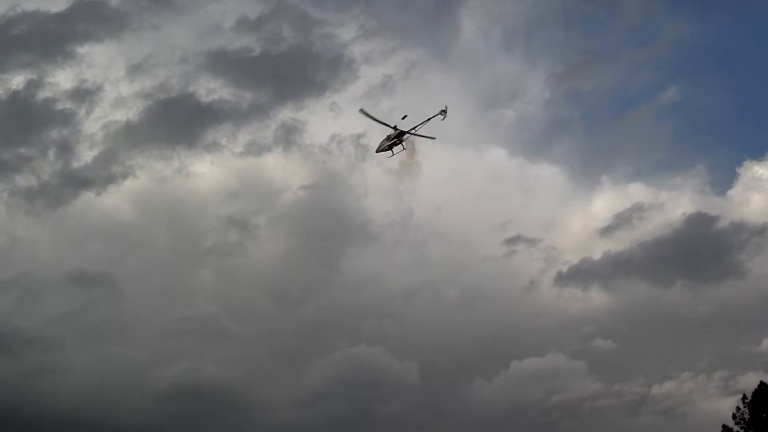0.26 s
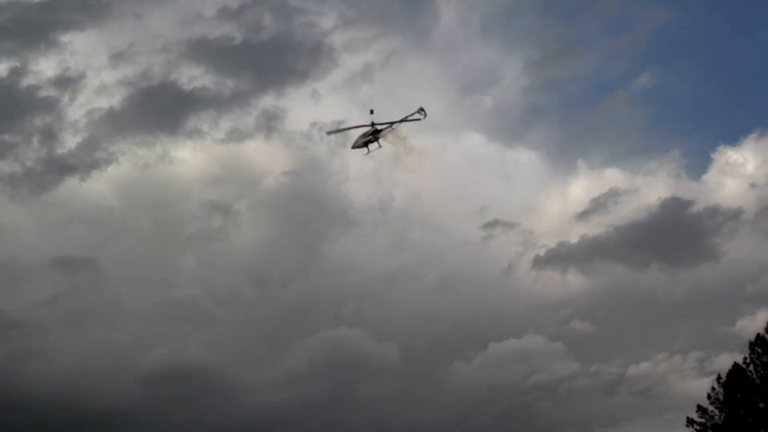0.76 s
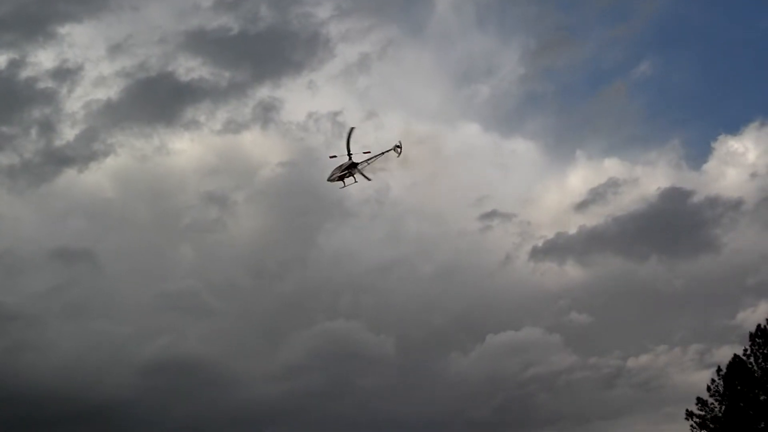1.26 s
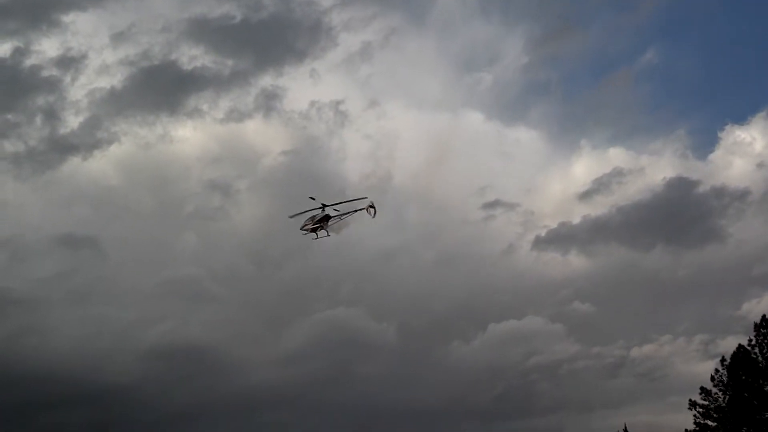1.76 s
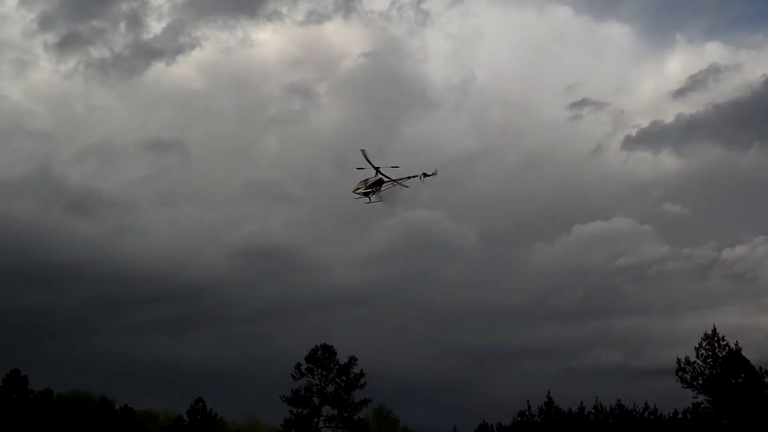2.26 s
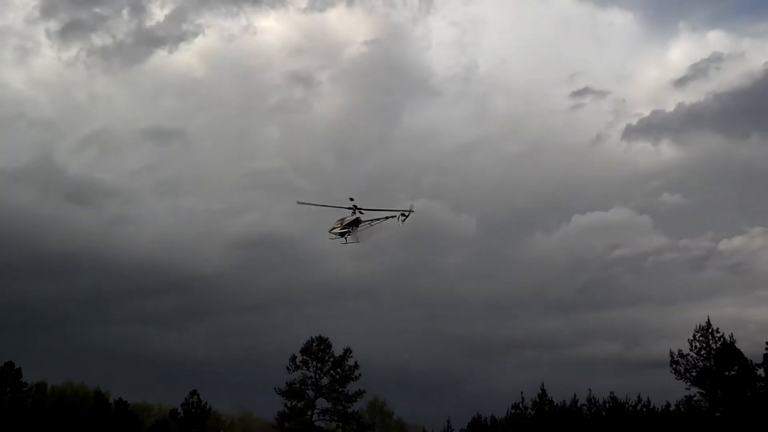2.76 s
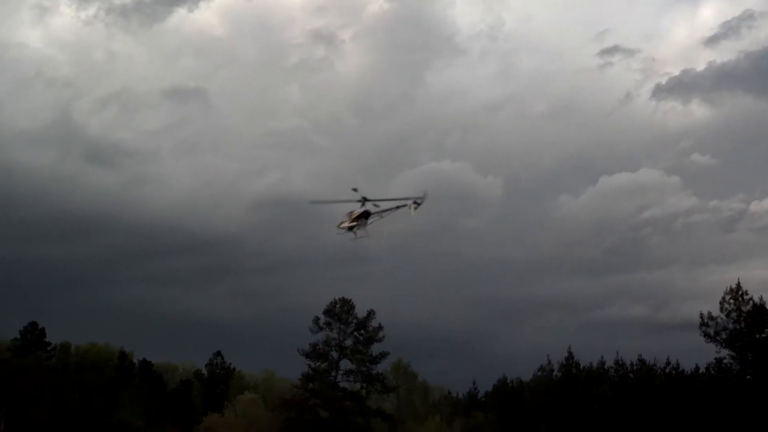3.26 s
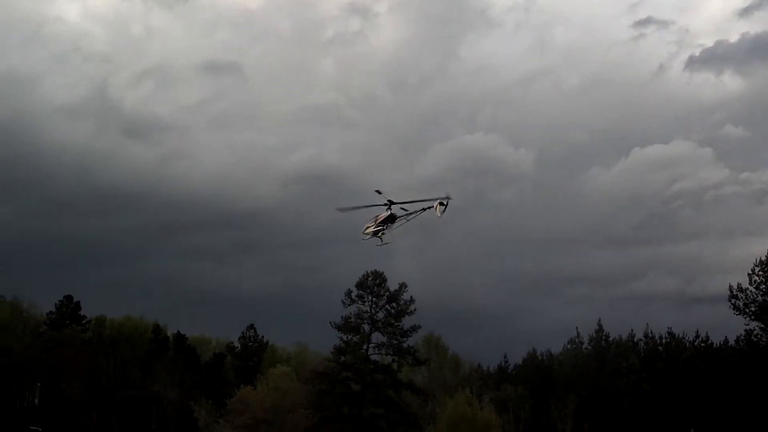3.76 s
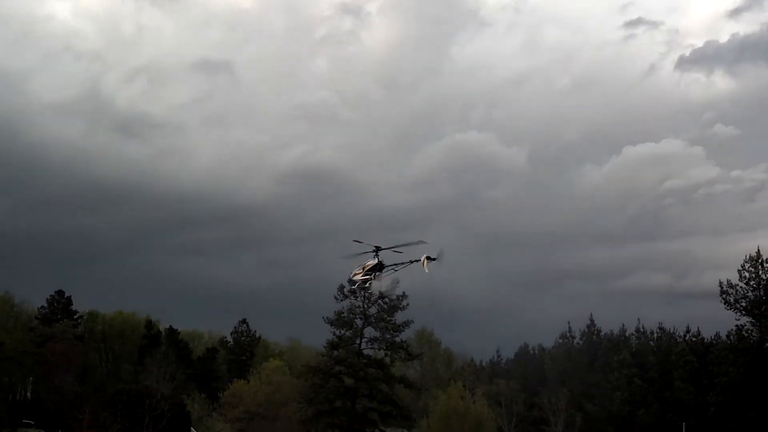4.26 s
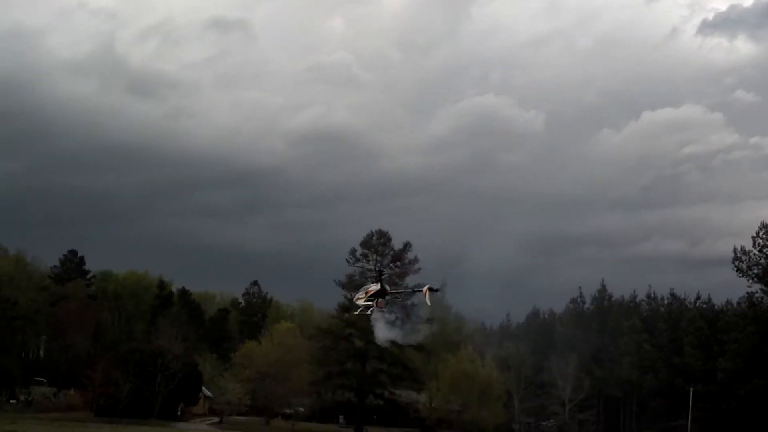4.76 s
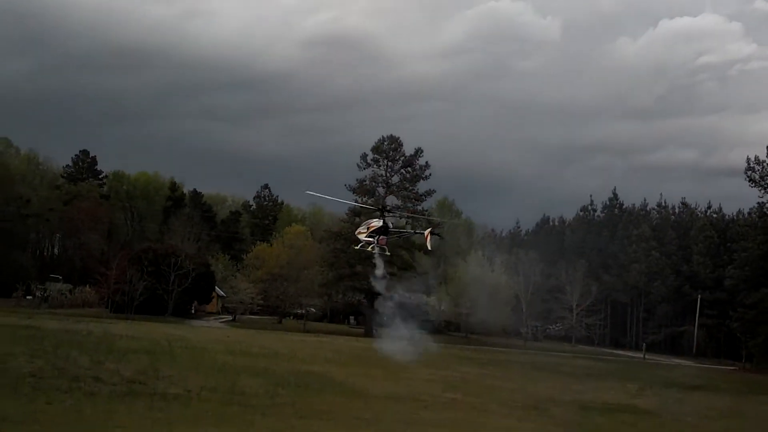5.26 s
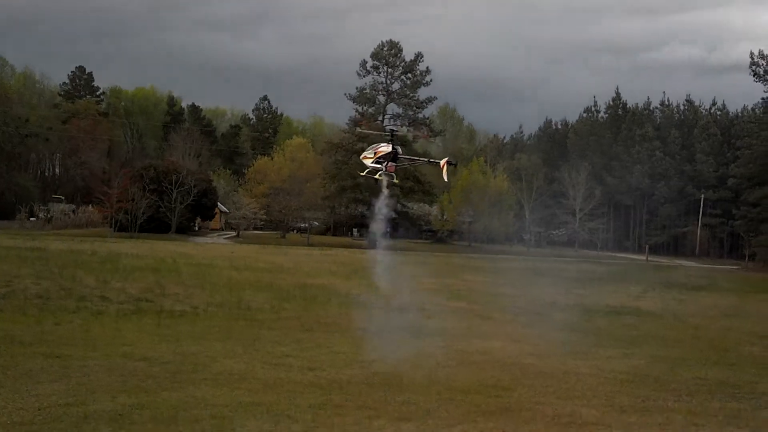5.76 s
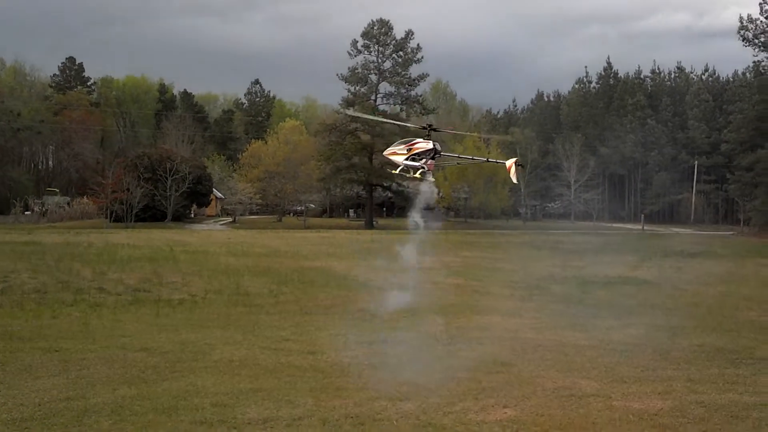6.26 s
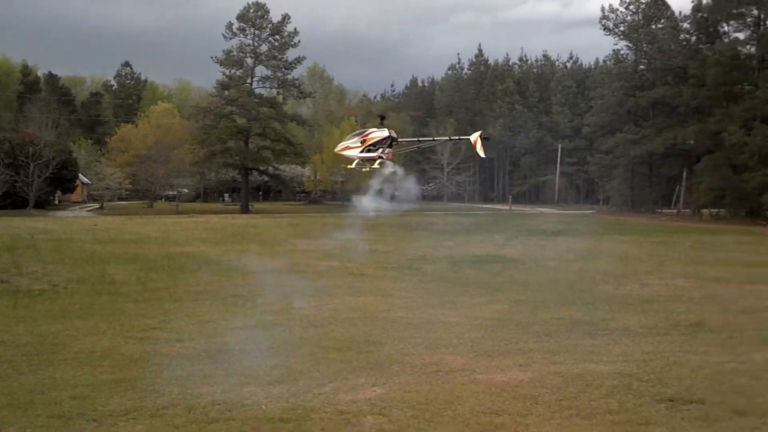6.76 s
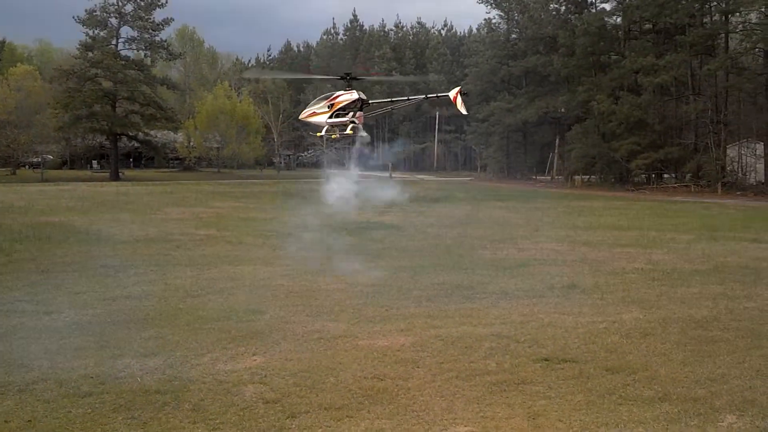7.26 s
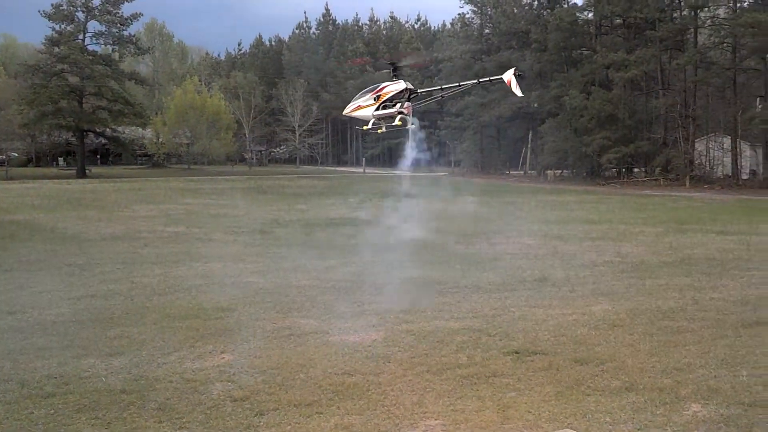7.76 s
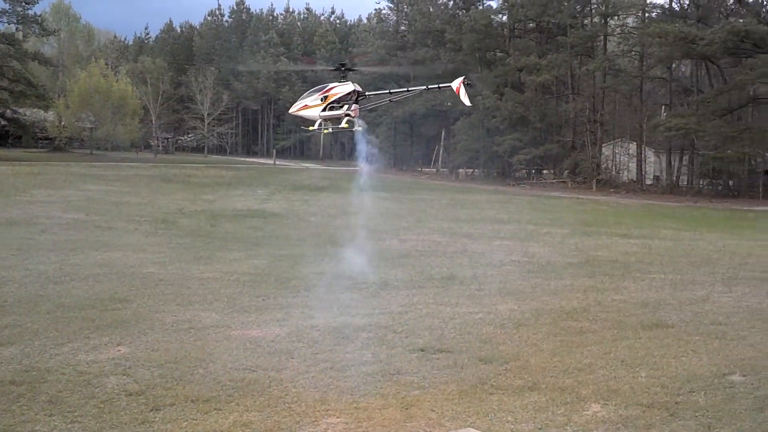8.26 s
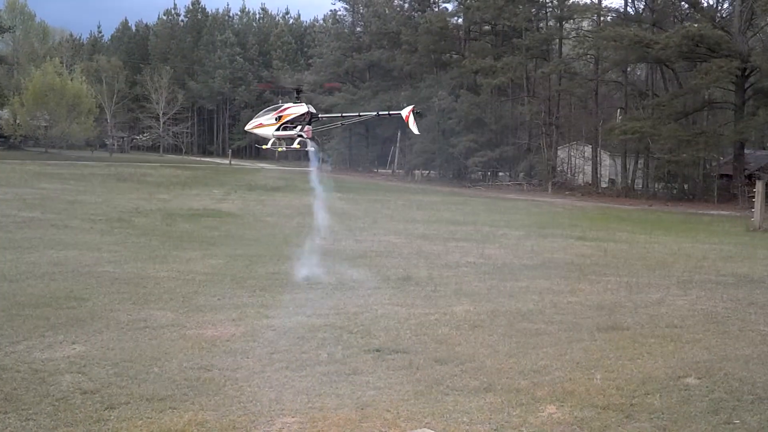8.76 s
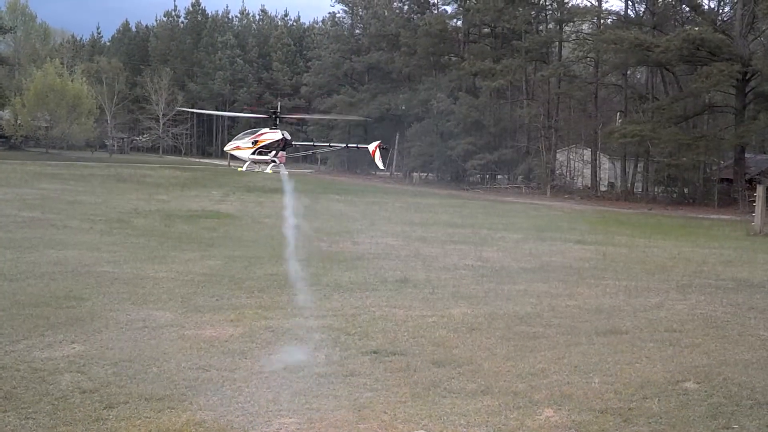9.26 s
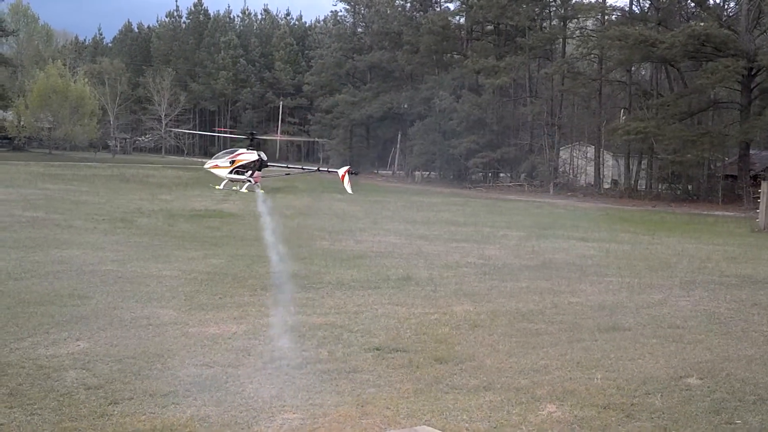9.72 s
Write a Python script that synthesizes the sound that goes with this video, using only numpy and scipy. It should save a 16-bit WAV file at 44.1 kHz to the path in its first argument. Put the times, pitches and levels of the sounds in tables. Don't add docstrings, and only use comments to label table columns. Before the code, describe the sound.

A small engine-powered model helicopter drones with a steady raspy buzz, hissing puffs and blade swish, sinking over a grassy field and hovering close by.

```python
import sys
import numpy as np
from scipy import signal
from scipy.fft import rfft, irfft, next_fast_len
from scipy.io import wavfile
from scipy.ndimage import uniform_filter1d

SR = 44100
rng = np.random.default_rng(int(sys.argv[2]) if len(sys.argv) > 2 else 0)


def wav_out(sig):
    wavfile.write(sys.argv[1], SR, np.round(np.clip(np.atleast_2d(sig).T, -1, 1) * 32767).astype(np.int16))


def invert_db(level):
    return 10 ** (np.asarray(level, dtype=float) / 20)


N = 440550
T = np.arange(N) / SR
SLOW_T = T[::256]

# start_s, engine_effort_db, muffler_toward_us_db
FLIGHT = [(0, 2.5, 1.5), (.8, 1, -4), (1.15, 2, -4.5), (1.55, 2, -2), (2.1, 0, -5.5), (2.7, 2, -3.5),
          (3.4, 2.5, -2.5), (4.1, 2.5, -4), (4.65, 0.5, -8), (5.2, 1.5, -5), (5.8, 1.5, -5), (6.4, 2.5, 1),
          (7.1, 0.5, 3.5), (7.9, 0.5, 6.5), (8.6, 1, 6), (9.2, -1.5, 0), (9.6, 0, -2), (9.99, 2.5, 8)]
# start_s, firing_rate_hz
ENGINE_SPEED = [(0, 103.3), (.65, 103.7), (1.2, 103.6), (2.06, 104.3), (2.4, 103.9), (2.85, 104.1),
                (3.35, 103.1), (3.9, 103.3), (4.4, 103.5), (4.9, 104.1), (6.2, 104.1), (7.8, 103.8),
                (8.05, 103.2), (8.5, 103.8), (9.1, 103.1), (9.4, 103.5), (9.99, 103.3)]
# firing_multiple, level_db
EXHAUST_TONES = [(3, -51.5), (5, -63.5), (7, -56), (8, -52.5), (9, -58), (10, -50.5), (12, -49.5),
                 (13, -50), (17, -65), (19, -50), (20, -45), (21, -53), (22, -46), (23, -68), (24, -59),
                 (25, -79), (26, -70), (29, -76), (30, -53), (34, -54), (35, -49.5), (36, -52.5), (37, -70),
                 (38, -57.5)]
# firing_multiple, level_db, echo_share (0-1), echo_shift_ms, before_swing_db
DRONE_LINES = [(1, -52, 0.68, -0.018, 0), (2, -37.5, 0.82, -0.33, -3), (4, -50, 0.45, .4, -4),
               (6, -46, 0.23, 0.092, -3), (11, -46.5, 0.37, 0.026, -4.5), (14, -46, 0.42, 0.047, -5),
               (15, -42.5, 0.64, 0.024, -5), (16, -41.5, 0.44, 0.015, -16), (18, -45, 0.4, 0.043, 5.5)]
# rotor_multiple, level_db
ROTOR_LINES = [(6, -61), (7, -56.5), (8, -54.5), (13, -59), (15, -61.5), (20, -63)]
# start_s, pitch_hz, level_db
WHISTLE_GLIDE = [(0, 1975, -44), (1, 1997, -55), (1.6, 2002, -41), (2.05, 2018, -39), (2.5, 1997, -42.5),
                 (3, 1960, -59), (3.5, 1910, -60), (4.75, 1950, -63), (5.3, 1910, -64), (5.9, 1950, -52),
                 (6.3, 1915, -37.5), (7, 1918, -43), (8.8, 1915, -52.5), (9.99, 1918, -33)]
# pitch_hz, level_db
ROAR_COLOUR = [(60, -19.5), (100, -10), (200, -6.5), (500, -7), (900, -9.5), (1500, -5), (2000, -5.5),
               (2500, -14.5), (3200, -10), (4500, -22)]
# pitch_hz, level_db
PUFF_COLOUR = [(1500, -24), (3000, -18), (3800, 1.5), (4800, -15), (5600, -1.5), (6700, 6.5), (8300, -10.5),
               (12000, -7.5), (15000, 0.5), (17000, -7.5)]
# pitch_hz, level_db
SWISH_COLOUR = [(2000, -20), (4500, -8.5), (7000, -5), (8500, -11), (10500, -4), (12000, -4),
                (13000, -14.5), (15000, -6.5), (17000, -10.5)]
# pitch_hz, level_db
RING_COLOUR = [(1500, -24), (1800, 0), (1950, 4.5), (2150, 2), (2350, -26)]
GUST_COLOUR = [(30, -30), (100, -1), (200, -3), (350, -16), (600, -28)]
# start_s, delay_ms
GRASS_PATH = [(0, 5.93), (.7, 5.88), (1.1, 5.72), (1.6, 5.29), (2.1, 4.77), (2.8, 4.16), (3.3, 3.97),
              (3.8, 3.7), (4.3, 3.45), (4.8, 2.89), (5.3, 2.61), (6, 2.48), (6.8, 2.55), (8.1, 2.67),
              (8.6, 2.53), (9.1, 2.31), (9.6, 1.95), (10, 1.74)]
# start_s, lag_samples
BEARING_LAG = [(0, 11.1), (1.3, 11.14), (1.9, 10.92), (2.05, 10.12), (4.2, 10.2), (6.7, 10.46),
               (6.8, 11.55), (7.9, 11.34), (8.1, 11.9), (9.99, 11.9)]
# pitch_hz, phase_lead_rad, bearing_sensitivity (ratio), first_minus_second_port_db, diffuse_share_db
PORT_COLOUR = [(100, -0.58, -10, 0, -30), (230, 0, 2, 1.5, -13.5), (600, 0.05, 0.5, 0.5, -14),
               (1257, 0.01, 1.6, 1.5, -20), (2190, 2.5, -0.05, -9, -9.5), (2140, 2, 7, -7.5, -12),
               (3526, 3, -0.1, 6, -11), (4470, 6, 1.5, 13.5, -16.5), (6330, 9, 1.32, -5, -9.5),
               (6940, 10, 1.44, 4, -12), (9300, 13.5, 2, 8, 0.5), (9900, 14.5, 2, 8, -16),
               (12630, 19, 0.57, -8.5, -2.5), (14450, 22.5, 1.1, -14.5, -5), (15900, 24, 1.6, -3, 1)]
# start_s (bump centre), level_db, length_s
GUST_BUMPS = [(4.045, -49, .03), (5.1, -52, 0.028), (5.28, -55, 0.019), (6.153, -53, 0.033),
              (6.592, -43, 0.017), (6.616, -37, 0.01), (6.651, -44, .02), (6.697, -38, 0.011),
              (6.725, -44, .012), (7.13, -50, 0.018), (7.781, -42, .03), (8.1, -43, 0.021),
              (8.841, -46, .02), (9.7, -51, 0.028), (9.95, -46, .03)]
# start_s, depth_db
GAIN_DUCKS = [(.08, -1), (.57, -1), (1.08, -2.5), (1.75, -1), (2.33, -0.5), (2.87, -3), (3.13, -2.5),
              (3.421, -2), (4.28, -2.5), (4.97, -2), (5.52, -1.5), (6.07, -2.5), (6.27, -2), (6.73, -2.5),
              (7.47, -2.5), (7.83, -2), (8.28, -2), (8.73, -1.5), (8.971, -1.5)]

ROTOR_RATIO = 4.5
EXHAUST_DB, HISS_DB, RING_DB = -28.5, -34.5, -34.5
HISS_PER_EFFORT, HISS_PER_TURN = 0.24, 0.16
FLUTTER_DB = 0.52
LOWER_DB, UPPER_DB, UPPER_PER_TURN = -46.5, -42, 4
BLADE_DRONE, BLADE_DRONE_DB = 11, -43
SWING_S, SWING_LENGTH_S = 1.4, 0.61
SMEAR, SMEAR_CENTRE = .014, 13
SPLIT = .19
GRASS_DB, GRASS_HZ, LINE_ECHO = -11.5, 1450, 0.52
USUAL_LAG, CROSS = 11, 16
DUCK_FALL_S, RECOVER_DB_PER_S = .02, 11
EDGE_HZ = 15800


def helicopter():
    (rate,) = curves(ENGINE_SPEED)
    effort_db, turn_db = curves(FLIGHT)
    flutter_db = FLUTTER_DB * full(drift(14., count=1)[0])
    ring_db = RING_DB + turn_db + flutter_db
    hiss_db = HISS_DB + HISS_PER_EFFORT * effort_db + HISS_PER_TURN * turn_db + flutter_db
    turns, rotor = shafts(rate)
    load = invert_db(1.23 * (EXHAUST_DB + effort_db + flutter_db + 29.5))
    hiss = puffs(turns, rotor) + swish(turns, rotor)
    broad = roar(turns, rotor, load) + ring(ring_db) + invert_db(hiss_db) * unevenness() * hiss
    steady = exhaust(turns, load, ring_db) + lines(ROTOR_LINES, rotor, wander_db=5.5)
    steady = steady + whistle(rotor * ROTOR_RATIO, rate, turn_db) + drone(turns, rotor, effort_db)
    return broad, steady


def shafts(rate):
    jitter = twice_smoothed(1500)
    shake = evened(uniform_filter1d(rng.standard_normal(N), 400))
    turns = np.cumsum(rate * (1 + 0.00297 * jitter + 0.002008 * shake)) / SR
    rotor = np.cumsum(uniform_filter1d(rate, SR // 2)) / SR / ROTOR_RATIO
    return turns, rotor


def drone(turns, rotor, effort_db):
    rotor_hz = rotor[-1] / T[-1]
    before_swing = np.clip((SWING_S - SLOW_T) / SWING_LENGTH_S, 0, 1)
    swells = 1.36 * drift(9., count=len(DRONE_LINES)) + 0.65 * effort_db[::256]
    out = np.zeros(N)
    for (k, db, share, shift_ms, early_db), swell_db in zip(DRONE_LINES, swells):
        level = invert_db(db + early_db * before_swing + swell_db)
        out += partial(level * echo(k * rotor_hz * ROTOR_RATIO, share, shift_ms), k, turns)
    out += partial(invert_db(BLADE_DRONE_DB) * echo(BLADE_DRONE * rotor_hz), BLADE_DRONE, rotor)
    return np.sqrt(2) * out


def exhaust(turns, load, ring_db):
    tones = lines(EXHAUST_TONES[:9], turns, wander_db=1.5) * load
    upper = lines(EXHAUST_TONES[9:], turns, wander_db=2.0) * invert_db(0.47 * (ring_db + 31.5))
    return tones + upper


def whistle(turns, rate, turn_db):
    hz, db = curves(WHISTLE_GLIDE, SLOW_T)
    own_turns, rate = np.cumsum(full(hz)) / SR, rate[::256]
    upper_db = UPPER_DB + UPPER_PER_TURN * np.minimum(turn_db[::256], 0)
    out = np.zeros(N)
    for level_db, k in ((db, 0), (LOWER_DB, -1), (upper_db, 1)):
        level = full(invert_db(level_db) * abs(echo(hz + k * rate)))
        out += level * np.cos(2 * np.pi * (own_turns + k * turns))
    return np.sqrt(2) * out


def roar(turns, rotor, load):
    pulse = 0.81 + 0.23 * beat(2 * rotor, 0.48, 0) + 0.14 * beat(turns, 6.6, 0)
    return invert_db(-39.0) * load * noise(ROAR_COLOUR) * pulse


def ring(ring_db):
    return invert_db(uniform_filter1d(ring_db, SR // 4) - 8) * noise(RING_COLOUR)


def puffs(turns, rotor):
    pulse = 0.49 + 0.57 * beat(turns, 2.9, 0.13) + 0.076 * beat(2 * rotor, 0.17, 0)
    return invert_db(-5.5) * noise(PUFF_COLOUR) * pulse


def swish(turns, rotor):
    pulse = .5 + 0.36 * beat(2 * turns, 0.95, 0.42) + 0.28 * beat(2 * rotor, 0.91, 0.055)
    return invert_db(-4.5) * noise(SWISH_COLOUR) * pulse


def grass(x):
    dull = signal.filtfilt(*signal.butter(1, GRASS_HZ, fs=SR), x)
    return x + invert_db(GRASS_DB) * np.interp(T - curves(GRASS_PATH)[0] / 1000, T, dull)


def ports(x):
    hz, t, z = signal.stft(x, SR, nperseg=512, noverlap=384)
    lead, sense, tilt_db, diffuse_db = (c[:, None] for c in read(PORT_COLOUR, hz))
    extra_lag = curves(BEARING_LAG, t)[0] - USUAL_LAG
    lead = lead + 2 * np.pi * hz[:, None] / SR * sense * extra_lag
    half = np.exp(.5j * lead) * invert_db(tilt_db / 2)
    paths = rng.standard_normal((4, len(t), len(hz)))
    paths = uniform_filter1d(uniform_filter1d(paths, size=4, axis=1), size=2, axis=2)
    paths = evened(paths).transpose(0, 2, 1)
    scatter = invert_db(diffuse_db - 6) * (paths[:2] + 1j * paths[2:])
    heard = z * (np.array([half, 1 / half]) + scatter)
    return signal.istft(heard, SR, nperseg=512, noverlap=384)[1][:, :N]


def gusts():
    shape = np.zeros(len(SLOW_T))
    for s, db, length in GUST_BUMPS:
        shape += invert_db(db) * np.exp(-.5 * ((SLOW_T - s) / length) ** 2)
    return np.array([[.5], [-.5]]) * (full(shape) + invert_db(-80)) * noise(GUST_COLOUR)


def lines(table, turns, wander_db):
    swells = drift(9., count=len(table))
    out, speed = np.zeros(N), (turns[-1] - turns[0]) / T[-1]
    for (k, db), swell in zip(table, swells):
        out += partial(invert_db(db + wander_db * swell) * echo(k * speed), k, turns)
    return np.sqrt(2) * out


def partial(gain, k, turns):
    lagged = k * turns - SMEAR * (k - SMEAR_CENTRE) ** 2 - SPLIT * (k % 2)
    return full(abs(gain)) * np.cos(2 * np.pi * lagged + full(np.angle(gain)))


def echo(hz, share=LINE_ECHO, shift_ms=0):
    late = (curves(GRASS_PATH, SLOW_T)[0] + shift_ms) / 1000
    return 1 + np.clip(share, 0, 1) * np.exp(-2j * np.pi * hz * late)


def beat(turns, sharp, start):
    return evened(np.exp(sharp * np.cos(2 * np.pi * (turns + start))))


def noise(points):
    size = next_fast_len(N)
    gain = invert_db(read(points, np.fft.rfftfreq(size, 1 / SR))[0])
    return evened(irfft(rfft(rng.standard_normal(size)) * gain, size)[:N])


def unevenness():
    return invert_db(0.78 * twice_smoothed(300))


def twice_smoothed(width):
    return evened(uniform_filter1d(uniform_filter1d(rng.standard_normal(N), width), width))


def drift(top_hz, count):
    hz = np.geomspace(.3, top_hz, 16)[:, None]
    phase = rng.random((count, 16, 1))
    waves = np.sin(2 * np.pi * (hz * SLOW_T + phase)) / np.sqrt(hz)
    return evened(waves.sum(1))


def evened(x):
    return x / np.sqrt(np.mean(x ** 2) + 1e-20)


def curves(rows, t=T):
    s, *columns = np.transpose(rows)
    return [np.interp(t, s, c) for c in columns]


def read(points, hz):
    f, *columns = np.transpose(points)
    return [np.interp(np.log(hz + 1), np.log(f + 1), c) for c in columns]


def full(slow):
    return np.interp(T, SLOW_T, slow)


def scene():
    broad, steady = helicopter()
    return ports(grass(broad) + steady) + gusts()


def ducking():
    gain_db = np.zeros(len(SLOW_T))
    for s, depth_db in GAIN_DUCKS:
        since = SLOW_T - s
        recovering_db = np.minimum(depth_db + RECOVER_DB_PER_S * since, 0)
        gain_db += recovering_db * np.clip(since / DUCK_FALL_S + .5, 0, 1)
    return full(invert_db(gain_db))


def roll_off(x):
    return signal.sosfilt(signal.butter(12, 17020, fs=SR, output="sos"), x)


def record(dry):
    late = np.pad(dry[::-1], ((0, 0), (CROSS, 0)))[:, :N]
    edge = signal.firwin(511, EDGE_HZ, window=("kaiser", 9), fs=SR)
    mix = signal.oaconvolve((dry - late) * ducking(), edge[None], "same")
    return roll_off(mix)


dry = scene()
out = record(dry)
wav_out(out)
```